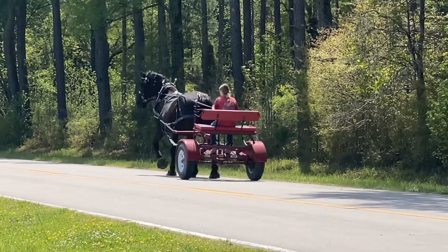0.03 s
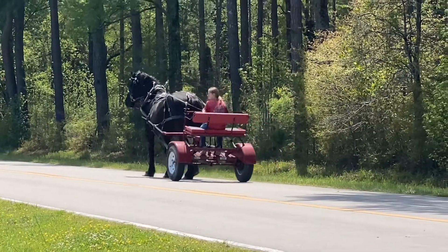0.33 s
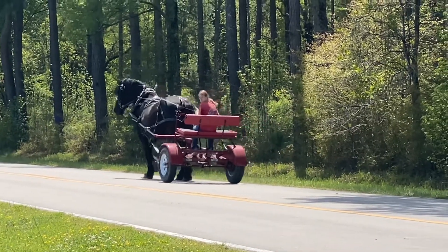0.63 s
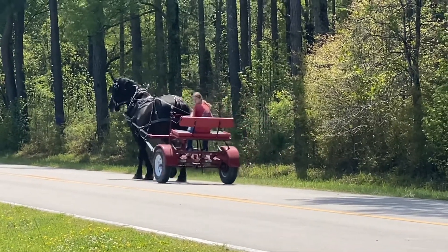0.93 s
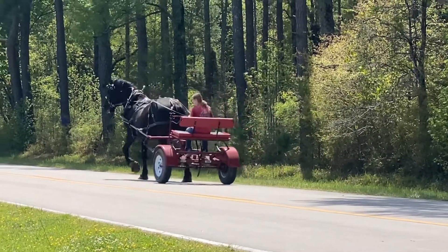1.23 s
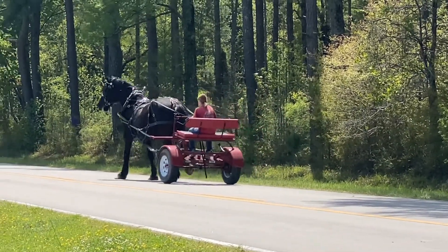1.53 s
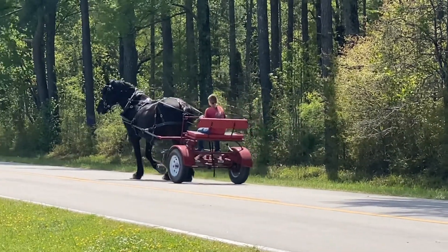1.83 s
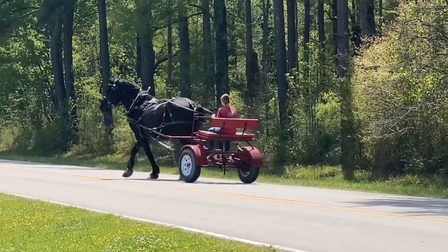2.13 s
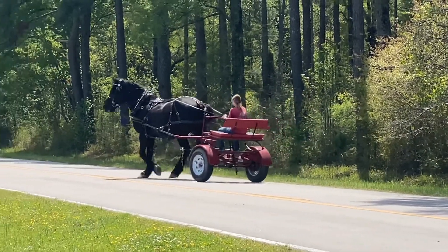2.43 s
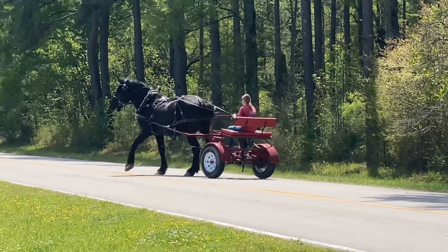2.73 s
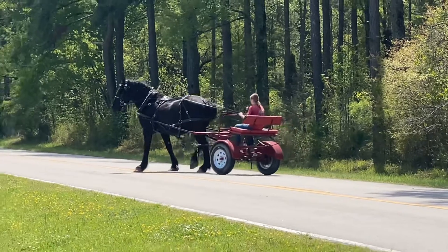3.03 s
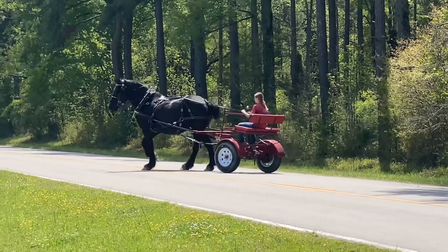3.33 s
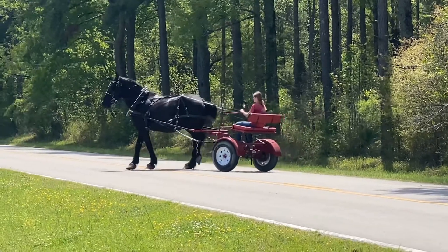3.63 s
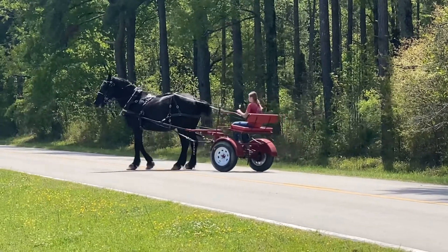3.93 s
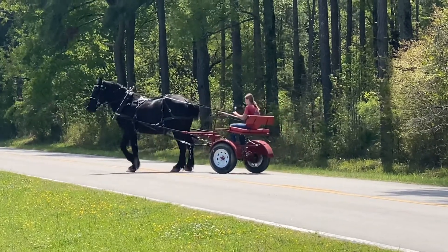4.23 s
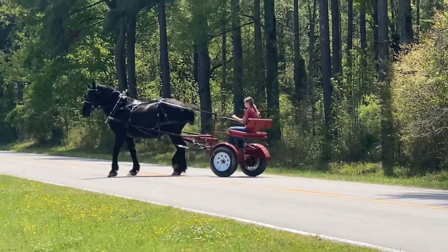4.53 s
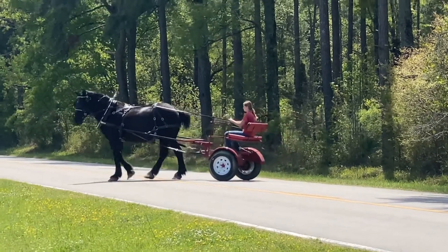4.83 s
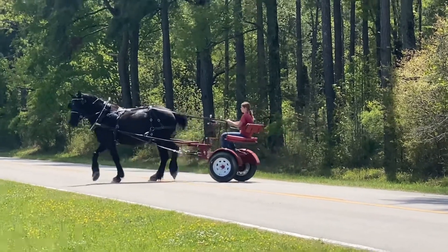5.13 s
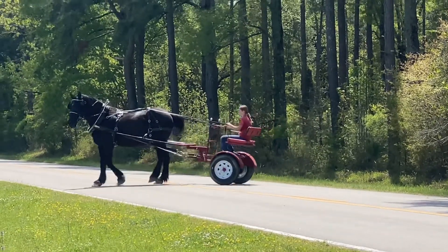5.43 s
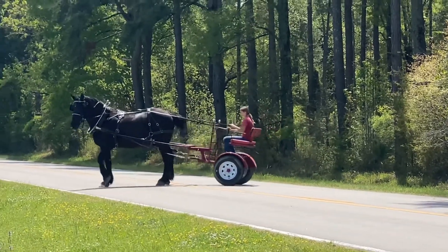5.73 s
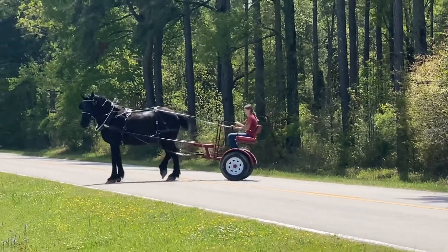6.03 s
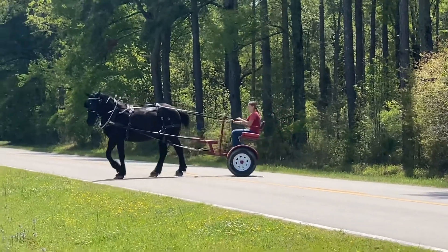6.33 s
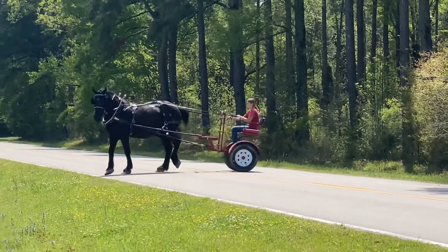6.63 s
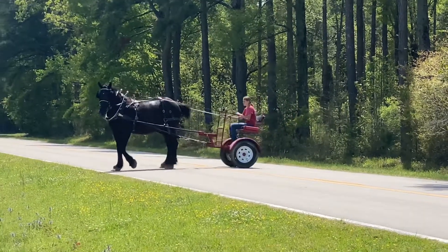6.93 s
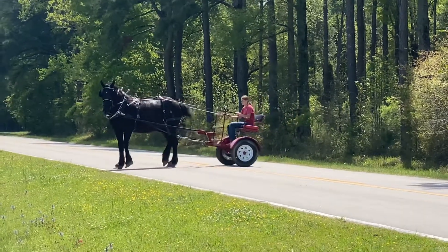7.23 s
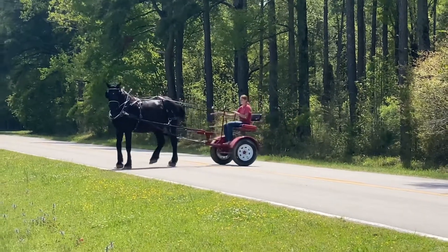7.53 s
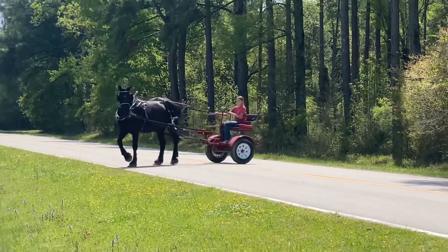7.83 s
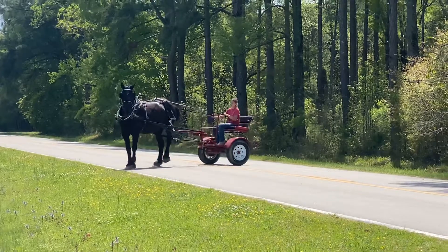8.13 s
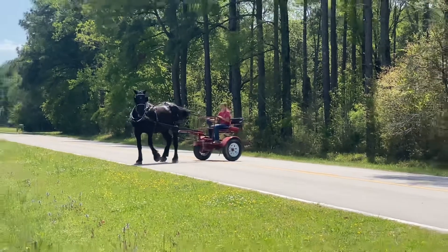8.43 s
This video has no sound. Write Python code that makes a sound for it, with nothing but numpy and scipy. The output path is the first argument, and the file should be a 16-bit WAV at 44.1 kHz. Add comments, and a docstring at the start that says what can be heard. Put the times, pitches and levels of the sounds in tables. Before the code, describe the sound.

Outdoors beside a wood, sparse hollow hoof clops mix with light clanks from a cart and the ticking and jingling of a harness. Birds chirp and warble with a slight echo above softly rustling trees. One short metallic squeak comes before the middle. Wind, at first only a few low puffs, then thumps and rumbles against the microphone in stronger gusts as the hooves and buckles carry on.

```python
"""A hoof clops and a hitch clanks in a puff of wind: a draught horse pulls a two-wheeled cart past a
pine wood. Each hoof rings like a hollow cup on the paved road while its shoe crushes grit. Loose steel
rattles, a dry joint squeaks once, and harness straps rub and shake their rings and buckles.
Birds sing among the echoing trunks, over a soft wash of trees and tyres.
Gusts buffet the microphone, mostly from the middle on."""
import sys
import numpy as np
from scipy import signal
from scipy.fft import rfft, irfft, next_fast_len
from scipy.io import wavfile

SR = 44100
rng = np.random.default_rng(int(sys.argv[2]) if len(sys.argv) > 2 else 0)


def master_out(mix):
    """Clip the mix to full scale and print it as 16-bit PCM to the path in sys.argv[1]."""
    frames = np.transpose(np.atleast_2d(mix))
    ceiling = np.clip(frames, -1, 1)
    pcm = np.round(ceiling * 32767).astype(np.int16)
    wavfile.write(sys.argv[1], SR, pcm)


N = 377937
TIME = np.arange(N) / SR  # seconds since the scene began
AGE = np.arange(SR // 2) / SR  # seconds since one short event began

# Levels are relative. A fade time (t60) is how long a sound takes to drop by 60 dB.
# Rustling trees and rolling tyres: (time [s], body level [dB], hiss level [dB])
WASH_LEVELS = [(0.0, -66.5, -67.5), (0.6, -70.5, -75), (1.0, -70.5, -76.5), (1.15, -69.5, -74.5),
               (2.34, -67.5, -73), (2.46, -66, -69), (2.76, -67.5, -74), (3.95, -65, -68.5),
               (4.3, -65, -74.5), (5.6, -64.5, -75), (6.2, -61, -72.5), (6.9, -63, -72), (7.7, -64, -70.5),
               (8.56, -63.5, -73)]
# Tone colour of their low body and their hiss: (frequency [Hz], level [dB])
BODY_SPECTRUM = [(20, -1), (60, 21), (300, 15), (500, 14.5), (800, 9), (1200, 2.5), (2100, 2.5),
                 (3000, -14.5), (5000, -70.5)]
HISS_SPECTRUM = [(1200, -4), (2500, 14.5), (3500, 11.5), (5200, 8), (6500, 2), (7800, -1.5), (9500, -6),
                 (11000, -11), (12000, -17.5), (15000, -29)]
# How alike the left and right noise are: (frequency [Hz], likeness [1 = the same])
STEREO_LIKENESS = [(30, 0.89), (300, 0.89), (600, 0.57), (1000, 0.31), (2000, 0.64), (4000, 1), (6500, 1),
                   (8000, 0.041), (11000, .2)]
# Echo among the trunks: (frequency [Hz], fade time [s])
TRUNK_ECHO = [(200, 0.24), (1000, 0.23), (2500, 0.29), (5000, 0.036), (11000, 0.19)]

# Gusts at the microphone: (start [s], length [s], rumble level [dB], flutter level [dB])
GUSTS = [(-.03, 0.23, -42, -59), (0.472, 0.31, -48, -62.5), (1.42, 4.4, -55.5, -64.5),
         (3.475, 0.32, -41.5, -69), (3.874, 0.34, -36.5, -65), (4.257, 0.81, -40.5, -53),
         (5.664, 0.58, -38.5, -52.5), (6.52, 0.65, -41, -56), (6.95, 0.51, -33.5, -48.5),
         (7.508, 0.16, -29, -42), (7.83, 0.47, -42, -60), (8.466, 0.093, -32, -39)]
# Tone colour of the wind's deep rumble and higher flutter: (frequency [Hz], level [dB])
RUMBLE_SPECTRUM = [(12, -54), (25, -33.5), (45, -5.5), (62, -2), (110, -7.5), (180, -17), (350, -33.5),
                   (800, -81)]
FLUTTER_SPECTRUM = [(40, -6), (110, 0.5), (200, -2.5), (350, -3), (550, -20), (850, -35), (1500, -53.5),
                    (4000, -86)]
# The largest swirls of air: (time [s], level [dB], starting frequency [Hz], length [s])
EDDIES = [(0.53, -36, 63, 0.012), (2.455, -39, 76, 0.016), (3.53, -24, 72.7, 0.016),
          (3.595, -30, 149.4, 0.014), (3.663, -27, 93.2, 0.01), (3.905, -32, 119.7, 0.021),
          (3.961, -19.5, 77.3, 0.015), (4.005, -30.5, 71, 0.049), (4.17, -37.5, 168, 0.034),
          (4.215, -30.5, 163.2, 0.016), (4.385, -34, 201.3, .012), (4.65, -34.5, 230.3, 0.031),
          (4.727, -29.5, 138.3, .012), (4.747, -30, 227.3, 0.018), (4.902, -26, 170, 0.0086),
          (4.921, -30, 208.5, 0.017), (5.034, -30, 159.7, 0.0092), (5.488, -32.5, 81, 0.0072),
          (5.827, -23, 300.5, 0.0054), (5.879, -24.5, 280.3, 0.021), (5.962, -30.5, 178, 0.011),
          (6.001, -25, 211.5, 0.017), (6.143, -36, 249.4, 0.011), (6.213, -28, 180.5, .024),
          (6.523, -24, 86.6, 0.0071), (6.54, -28.5, 229.5, 0.004), (6.692, -28, 84, 0.017),
          (7.022, -30.5, 281.5, 0.023), (7.044, -23.5, 400, 0.019), (7.153, -26, 440.2, 0.02),
          (7.369, -21.5, 189.4, 0.013), (7.423, -29, 88.5, 0.028), (7.519, -26, 335, 0.011),
          (7.544, -20.5, 340.2, 0.012), (7.577, -20, 115, 0.033), (7.643, -26.5, 227.6, .01),
          (7.666, -28.5, 249, 0.026), (8.024, -35, 207, 0.028), (8.225, -35, 70.2, 0.012),
          (8.53, -15.5, 199.5, 0.0087)]

# Bird notes by name: (length [s], first pitch [Hz], last pitch [Hz], bend [over 1 glides late],
# trill [share of the pitch], swell [over 1 peaks late])
NOTE_SHAPES = { "fall": (.095, 4700, 3300, 1.3, .045, 1.3), "climb": (.085, 2450, 3300, 1.3, .04, 2.2),
               "chip": (.032, 3120, 3750, 2.2, .006, 1), "seet": (.045, 5750, 5250, 1, .006, 1),
               "zip": (.035, 6500, 7550, .7, .02, 1), "whistle": (.14, 4760, 4880, 1.3, .006, 2.8),
               "pip": (.095, 4880, 4950, 1, .006, 2.5), "swoop": (.085, 2900, 4400, .42, .004, .7),
               "high": (.07, 7100, 8250, .5, .002, 1), "slide": (.12, 6900, 7700, .5, .002, .6)}
# When the warbler sings: (start [s], end [s], level [dB])
WARBLES = [(1.279, 3.0, -65), (7.117, 8.55, -65)]
# The warbler's phrase and a second bird's call: (delay [s], level [dB], note name)
WARBLE_PHRASE = [(0.0, 1.5, "climb"), (.116, 1, "fall")]
CHIP_CALL = [(0.0, 0, "chip"), (0.118, -7, "chip")]
# Thin notes from other birds: (time [s], level [dB], note name)
SINGLE_NOTES = [(0.187, -57.5, "zip"), (5.452, -52, "whistle"), (5.568, -61.5, "swoop"),
                (5.606, -59, "pip"), (5.68, -63.5, "high"), (5.75, -67, "slide"), (7.585, -63, "seet")]

# Straps sliding over the horse: (start [s], length [s], rubbing level [dB], jingling level [dB])
STRAP_SLIDES = [(0.12, 0.46, -75, -84), (0.56, 0.26, -74, -69.5), (1.044, 0.46, -73, -73.5),
                (3.47, 0.18, -75, -72), (5.242, 0.33, -75, -86), (6.484, 0.37, -76, -72.5),
                (7.144, 0.93, -77, -89)]
# The tones of a buckle: (pitch [Hz], level [dB], fade time [s])
BUCKLE_TONES = [(5500, 2, 0.042), (5840, 0, 0.044), (10300, -12, 0.044)]
# Buckles and chain links ticking: (time [s], level [dB])
LINK_TICKS = [(0.407, -47), (0.575, -45.5), (0.694, -43.5), (1.291, -49), (1.546, -44), (2.335, -50.5),
              (3.198, -34), (3.362, -43.5), (3.389, -45), (3.533, -54), (3.797, -58), (3.939, -52),
              (3.96, -54), (4.22, -47), (5.168, -44), (5.214, -46), (5.985, -49.5), (6.525, -50),
              (6.544, -38), (6.566, -42), (6.611, -43), (6.677, -46.5), (6.942, -41), (7.179, -40),
              (7.21, -46), (7.332, -54), (7.443, -39.5), (7.77, -50), (7.817, -38), (8.401, -44)]
# Steel fittings ringing on: (time [s], level [dB], pitch [Hz], fade time [s])
FITTING_RINGS = [(.07, -58.5, 2046, 1.4), (3.2, -57, 10080, 0.24), (3.199, -63, 10740, 0.28),
                 (3.386, -55.5, 1975, 1.4), (3.385, -52, 1900, 0.55), (3.386, -69, 3950, .8)]
# A small harness ring jingling: (time [s], level [dB], fade time [s])
JINGLES = [(0.447, -63, 0.15), (.752, -67, 0.37), (1.48, -66, 0.44), (1.676, -64, 0.14), (6.548, -63, .3),
           (6.6, -63, 0.17)]
# The tones of that ring: (pitch [Hz], level [dB])
JINGLE_TONES = [(5280, 0.5), (5440, 3), (10800, -4.5), (14200, -10)]

# The course of the dry joint's squeak: (time [s], level [dB], pitch [Hz])
SQUEAK_CURVE = [(3.376, -42, 1880), (3.381, -52, 1900), (3.389, -40.5, 1999), (3.403, -53, 1932),
                (3.44, -52, 1910), (3.48, -64, 1960)]
# The tones in the squeak: (multiple of the pitch, level [dB])
SQUEAK_TONES = [(1, -1.5), (2, -7), (3, -8)]
# The loose hitch and shafts knocking:
# (time [s], level [dB], centre frequency [Hz], fade time [s], frame ringing [dB])
CLANKS = [(0.063, -53, 5500, 0.19, -32), (0.082, -47, 4000, 0.04, -40), (1.1, -53.5, 4300, 0.3, -13),
          (1.121, -44.5, 5450, 0.038, -22), (2.397, -43, 3560, 0.11, -18.5), (2.418, -59, 2200, 0.1, 2.5),
          (2.5349, -46, 3800, 0.16, -14), (2.586, -52.5, 2960, 0.39, -14), (3.835, -40.5, 3050, 0.057, -31),
          (3.988, -43, 3660, 0.09, -21), (7.276, -46.5, 4080, 0.037, -25)]
# The tones of the cart's frame: (pitch [Hz], level [dB], fade time [s])
FRAME_TONES = [(1192, -0.5, 0.28), (1796, 0.5, 0.18), (3090, 1, 0.05), (5600, -3, 0.093)]

# Shoes dragging on the road: (time [s], length [s], level [dB], centre frequency [Hz])
SHOE_SCRAPES = [(.336, 0.015, -78, 1680), (0.723, 0.011, -69.5, 676), (2.27, 0.021, -76.5, 1600),
                (2.962, 0.039, -77, 890), (3.671, 0.035, -72, 1200), (4.093, 0.025, -70.5, 1390),
                (5.603, 0.02, -72, 1400), (6.99, 0.013, -67.5, 1690), (8.09, 0.013, -72.5, 1490)]
# Hooves landing: (time [s], level [dB], pitch [Hz], grit level [dB], fade time [s])
HOOF_STEPS = [(0.062, -29, 1320, -73, 0.0052), (0.598, -45, 726, -79, 0.029), (.604, -39, 363, -84, 0.01),
              (1.983, -46, 406, -71, 0.027), (2.265, -48, 694, -83, 0.02), (2.566, -46.5, 765, -65, 0.04),
              (2.997, -48, 420, -78, 0.036), (3.218, -42.5, 432, -70, 0.021),
              (4.021, -46, 732, -67.5, 0.049), (5.583, -43, 850, -80, 0.008),
              (5.612, -44.5, 610, -69.5, 0.029), (6.992, -37, 1120, -63, 0.0044),
              (7.919, -45.5, 510, -85, 0.03), (8.311, -44, 563, -65.5, 0.038),
              (8.433, -49, 654, -82, 0.029)]


def amp(db):
    """Turns decibels into a number to multiply a sound by."""
    return 10 ** (np.asarray(db) / 20)


def unit(x):
    """Scales a signal to an average strength (rms) of 1."""
    return x / np.sqrt(np.mean(x ** 2) + 1e-30)


def read(points, hz):
    """Looks up a table's value at hz, on a scale where all octaves are equally wide."""
    f, value = np.transpose(points)
    return np.interp(np.log(hz + 1), np.log(f), value)


def follow(rows, t=TIME):
    """Looks up each column of a table at the times t."""
    times, *columns = np.transpose(rows)
    return [np.interp(t, times, column) for column in columns]


def add(mix, s, sound):
    """Mixes a sound in at s seconds."""
    part = mix[max(round(s * SR), 0):][:len(sound)]
    part += sound[:len(part)]


def rise(seconds):
    """A soft start."""
    return 1 - np.exp(-AGE / seconds)


def fade(t60, t=AGE):
    """Dies away by 60 dB every t60 seconds."""
    return np.exp(-np.log(1000) * t / t60)


def tone(hz):
    """A pure tone that starts at a random point in its wave."""
    return np.sin(2 * np.pi * (hz * AGE + rng.random()))


def band(hz, octaves, size=len(AGE)):
    """Noise that is strongest at hz and weaker to either side."""
    f = np.fft.rfftfreq(size, 1 / SR) + 1
    bell = np.exp(-.5 * (np.log2(f / hz) / octaves) ** 2)
    return unit(irfft(rfft(rng.standard_normal(size)) * bell, size))


def wander(rate, size=len(AGE)):
    """A smooth random wobble, up to about rate times a second."""
    f = np.fft.rfftfreq(size, 1 / SR)
    return unit(irfft(rfft(rng.standard_normal(size)) * np.exp(-(f / rate) ** 2), size))


def stereo_noise(spectrum, low_hz, high_hz):
    """Left and right noise; the part they share has strength 1 between low_hz and high_hz."""
    f = np.fft.rfftfreq(N, 1 / SR)
    mid, side = rfft(rng.standard_normal((2, N))) * amp(read(spectrum, f))
    alike = read(STEREO_LIKENESS, f)
    side = side * np.sqrt((1 - alike) / (1 + alike))
    strength = irfft(mid * (f > low_hz) * (f < high_hz), N).std()
    return irfft(np.array([mid + side, mid - side]), N) / strength


def woods(x, echo_db, width=0.32, echoes_per_s=2000):
    """The direct sound plus stereo echoes scattered by the trunks."""
    bounces = rng.standard_normal((2, SR)) * (rng.random((2, SR)) < echoes_per_s / SR)
    hz, t, spectra = signal.stft(bounces, SR, nperseg=256)
    spectra = spectra * fade(read(TRUNK_ECHO, hz)[:, None], t) * np.minimum(t / 0.0011, 1)
    tail = signal.istft(spectra, SR, nperseg=256)[1]
    mid, side = signal.fftconvolve(x[None], tail / np.linalg.norm(tail[0]), axes=1)[:, :N]
    return x + amp(echo_db) * np.array([mid + width * side, mid - width * side])


def far_echo(x, echo_db, t60, echoes_per_s=2000):
    """The direct sound plus a long, soft echo from deep in the wood."""
    t = np.arange(SR) / SR
    bounces = rng.standard_normal(SR) * (rng.random(SR) < echoes_per_s / SR)
    tail = bounces * fade(t60, t) * np.minimum(t / 0.0064, 1)
    return x + amp(echo_db) * signal.fftconvolve(x, tail / np.linalg.norm(tail))[:N]


def trees_and_tyres(body_db=-0.96, hiss_db=-1):
    """Rustling trees and rolling tyres blend into a steady wash with a slightly restless hiss."""
    body_level, hiss_level = follow(WASH_LEVELS)
    body = stereo_noise(BODY_SPECTRUM, 1000, 2500) * amp(body_level + body_db)
    hiss = stereo_noise(HISS_SPECTRUM, 3500, 8000) * amp(hiss_level + hiss_db + .5 * wander(22, N))
    return body + hiss


def wind(attack_s=0.0083, t60=0.37, wake_s=0.021, quick_hz=190, lump_db=4.5):
    """Air churns at the microphone: each gust swells, holds and dies away, rumbling and fluttering."""
    rumble_gain, flutter_gain = amp(-60), amp(-64)  # the calm between gusts
    for s, length, rumble_db, flutter_db in GUSTS:
        swell = np.clip((TIME - s) / attack_s, 0, 1) * fade(t60, np.maximum(TIME - s - length, 0))
        rumble_gain = np.maximum(rumble_gain, amp(rumble_db) * swell)
        flutter_gain = np.maximum(flutter_gain, amp(flutter_db) * swell)
    for s, db, hz, _ in EDDIES:  # slow swirls stir up the rumble, quick ones the flutter
        wake = amp(db) * np.exp(-np.minimum(((TIME - s) / wake_s) ** 2, 20))
        quick = hz ** 3 / (hz ** 3 + quick_hz ** 3)
        rumble_gain = np.maximum(rumble_gain, amp(-12) * wake * (1 - quick))
        flutter_gain = np.maximum(flutter_gain, amp(-13) * wake * quick)
    lumps = lump_db * wander(30, N)
    rumble = stereo_noise(RUMBLE_SPECTRUM, 25, 150) * rumble_gain * amp(0.65 * lumps - 1)
    flutter = stereo_noise(FLUTTER_SPECTRUM, 200, 600) * flutter_gain * amp(lumps - 1)
    return rumble + flutter


def buffets(rise_cycles=0.31, rest_hz=66, slowing=0.535, unsteady=0.22, lead_s=.05):
    """A swirl of air hits the microphone: the pressure swings, then settles unevenly to a low wobble."""
    out = np.zeros((2, N))
    t = AGE - lead_s  # zero at the peak of the hit
    for s, db, hz, length in EDDIES:
        from_peak = np.where(t < 0, t * hz / rise_cycles, np.pi / 2 * t / length)
        swell = amp(db) / np.cosh(np.clip(from_peak, -20, 20))
        pitch = rest_hz + (hz - rest_hz) * np.exp(-np.maximum(t, 0) / (slowing * length))
        cycles = np.cumsum(pitch * np.exp(unsteady * wander(250))) / SR + rng.random()
        lean = .1 * rng.standard_normal()  # a little to the left or right
        for channel, tilt in zip(out, (lean, -lean)):
            add(channel, s - lead_s, (1 + tilt) * swell * np.sin(2 * np.pi * cycles + tilt))
    return out


def bird_note(length, first_hz, last_hz, bend, trill, swell=1, octave_db=-60):
    """One gliding whistle that swells and fades, with a weak overtone an octave up."""
    progress = np.minimum(AGE / length, 1)
    hz = (first_hz + (last_hz - first_hz) * progress ** bend) * (1 + trill * wander(350))
    phase = 2 * np.pi * np.cumsum(hz) / SR
    loudness = np.sqrt(abs(np.sin(np.pi * progress ** swell)))
    return loudness * (np.sin(phase) + amp(octave_db) * np.sin(2 * phase))


def far_birds(level_db=-76, spread_db=5.5, low_hz=2100, high_hz=4200, count=260):
    """Far birds twitter at random deep in the wood."""
    out = np.zeros(N)
    for when, pitch, glide, length in rng.random((count, 4)):
        hz = low_hz * (high_hz / low_hz) ** pitch
        note = bird_note(0.014 + 0.025 * length, hz, hz * (1 + .22 * (glide - .5)), bend=1, trill=0.013)
        add(out, when * N / SR, amp(level_db + spread_db * rng.standard_normal()) * note)
    return far_echo(out, echo_db=-6.5, t60=.6)


def warbler(period_s=.2515, vary_octaves=0.043, ragged_db=3.5, level_db=-3):
    """A warbler see-saws up and down, its ragged notes never quite alike and half lost in their echo."""
    out = np.zeros(N)
    notes = [(s + delay, db + level, name)
             for start, end, db in WARBLES
             for s in np.arange(start, end, period_s)
             for delay, level, name in WARBLE_PHRASE]
    for (s, db, name), drift in zip(notes, rng.standard_normal((len(notes), 2))):
        length, first_hz, last_hz, *shape = NOTE_SHAPES[name]
        pitches = np.array([first_hz, last_hz]) * 2 ** (vary_octaves * drift)
        add(out, s, amp(db + ragged_db * wander(83)) * bird_note(length, *pitches, *shape))
    return amp(level_db) * far_echo(out, echo_db=-2, t60=.64)


def near_birds(call_start_s=3.56, call_end_s=4.8, period_s=.286, call_db=-56.5):
    """One nearer bird repeats an even two-note call; others whistle thin single notes."""
    out = np.zeros(N)
    for s in np.arange(call_start_s, call_end_s, period_s):
        for delay, level, name in CHIP_CALL:
            add(out, s + delay, amp(call_db + level) * bird_note(*NOTE_SHAPES[name]))
    for s, db, name in SINGLE_NOTES:
        octave_db = -12 if name in ("whistle", "pip") else -np.inf  # only steady notes get an overtone
        add(out, s, amp(db) * bird_note(*NOTE_SHAPES[name], octave_db=octave_db))
    return far_echo(out, echo_db=-8, t60=0.79)


def straps(rub_hz=6500, grain_db=3, shakes_per_s=150):
    """Straps slide in soft, grainy swells while small knocks keep their buckles ringing."""
    rub = band(rub_hz, octaves=0.32, size=N) * amp(grain_db * wander(150, N))
    knocks = (rng.random(N) < shakes_per_s / SR) * rng.standard_normal((len(BUCKLE_TONES), N))
    tones = [amp(db) * tone(hz) * fade(t60) * rise(0.0007) for hz, db, t60 in BUCKLE_TONES]
    jingle = unit(sum(signal.oaconvolve(hits, ring)[:N] for hits, ring in zip(knocks, tones)))
    out = np.zeros(N)
    for s, length, rub_db, jingle_db in STRAP_SLIDES:
        swell = np.sin(np.pi * np.clip((TIME - s) / length, 0, 1))
        out += swell * (amp(rub_db) * rub + amp(jingle_db) * jingle)
    return out


def small_links(level_db=5, range_db=9, low_hz=4800, high_hz=8000, t60=0.019, count=110):
    """Small links tick at random, more strongly when the trees and tyres hiss louder."""
    out = np.zeros(N)
    for when, softness, *pitches in rng.random((count, 7)):
        s = when * N / SR
        _, hiss_db = follow(WASH_LEVELS, s)
        link = sum(tone(low_hz * (high_hz / low_hz) ** pitch ** 2) for pitch in pitches)
        add(out, s, amp(hiss_db + level_db - range_db * softness) * link * fade(t60))
    return out


def link_ticks(tick_hz=6100, link_db=-13, link_t60=0.022, cutoff_hz=11000):
    """Buckles and chain links tick and settle, each with four short tones of its own."""
    out = np.zeros(N)
    shape = amp(-3) * fade(0.012) + amp(-24) * fade(0.25)  # a sharp tick, then quiet settling
    for s, db in LINK_TICKS:
        pitches = tick_hz * 2 ** rng.uniform(-0.241, 1.0, size=4)
        link = sum(tone(hz) for hz in pitches) * fade(link_t60)
        tick = band(tick_hz, octaves=0.58) * shape * amp(2.8 * wander(300))
        add(out, s, amp(db) * (tick + amp(link_db) * link) * rise(0.002))
    return signal.sosfilt(signal.butter(6, cutoff_hz, fs=SR, output="sos"), out)


def fittings(level_db=-1, waver_db=4.1):
    """Steel fittings ring on in pure tones that waver in loudness."""
    out = np.zeros(N)
    for s, db, hz, t60 in FITTING_RINGS:
        ring = tone(hz) * amp(waver_db * wander(70))
        add(out, s, amp(db + level_db) * ring * fade(t60) * rise(0.0022))
    return out


def harness_ring(level_db=-1, flutter_db=5.0, detune=0.009):
    """A small ring rattles as it chimes, so each of its tones flutters on its own."""
    out = np.zeros(N)
    for s, db, t60 in JINGLES:
        chime = sum(tone(hz * (1 + detune * rng.standard_normal()))
                    * amp(level + flutter_db * wander(200)) for hz, level in JINGLE_TONES)
        add(out, s, amp(db + level_db) * chime * fade(t60) * rise(0.00092))
    return out


def squeak(roughness=0.022, dulling_db_per_s=60):
    """A dry joint sticks and slips; its overtones fade as the pressure eases."""
    t = np.arange(SQUEAK_CURVE[0][0], SQUEAK_CURVE[-1][0], 1 / SR)
    db, hz = follow(SQUEAK_CURVE, t)
    cycles = np.cumsum(hz * (1 + roughness * wander(290, len(t)))) / SR
    dulling_db = dulling_db_per_s * (t - t[0])
    slips = sum(amp(level - (multiple > 1) * dulling_db) * np.sin(2 * np.pi * multiple * cycles)
                for multiple, level in SQUEAK_TONES)
    out = np.zeros(N)
    add(out, t[0], amp(db) * slips * rise(0.0019)[:len(t)])
    return out


def hitch(crash_db=-7, chatter_db=3, jostle=0.027):
    """Loose steel chatters and sets the cart's frame ringing."""
    out = np.zeros(N)
    for s, db, hz, t60, ring_db in CLANKS:
        crash = band(hz, octaves=0.6) * fade(t60) * amp(chatter_db * wander(77))
        ring = np.zeros(len(AGE))
        for frame_hz, level, frame_t60 in FRAME_TONES:
            pitch = frame_hz * (1 + jostle * wander(200))  # the loose contact jostles each tone
            ring += amp(level) * np.sin(2 * np.pi * np.cumsum(pitch) / SR) * fade(frame_t60)
        add(out, s, amp(db) * (amp(crash_db) * crash + amp(ring_db) * ring) * rise(0.00096))
    return out


def shoe_scrapes(grain_db=4):
    """A horseshoe slides a little and crushes grit in one short, grainy swell."""
    out = np.zeros(N)
    for s, length, db, hz in SHOE_SCRAPES:
        swell = np.sin(np.pi * np.minimum(AGE / length, 1))
        add(out, s, amp(db + grain_db * wander(400)) * swell * band(hz, octaves=0.72))
    return out


def hooves(overtone_ratio=1.843, rise_cycles=0.42, grain_db=4, toe_delay_s=.0028, cutoff_hz=2000):
    """Each hoof rings like a hollow cup over a thud and a scuff; its shoe cracks down and crushes grit."""
    knocks, crunch = np.zeros((2, N))
    for s, db, hz, grit_db, t60 in HOOF_STEPS:
        cup = (tone(hz) + amp(-11) * tone(hz * overtone_ratio)) * fade(t60)
        thud = amp(-10) * tone(hz / 2) * fade(t60)
        scuff = amp(-9) * band(hz, octaves=0.45) * fade(2 * t60)
        add(knocks, s, amp(db) * (cup + thud + scuff) * rise(rise_cycles / hz))
        grit = amp(grit_db - 6 + grain_db * wander(660)) * band(3250, octaves=0.55) * fade(0.13)
        add(crunch, s, grit)
        toe_crack = amp(grit_db + 10) * band(2300, octaves=0.64) * fade(0.013)
        add(crunch, s + toe_delay_s, toe_crack)
    muffle = signal.butter(5, cutoff_hz, fs=SR, output="sos")  # a hoof is too soft to ring high
    return signal.sosfilt(muffle, knocks) + crunch


def scene():
    """Horse and cart on the road, birds in the wood, wind at the microphone."""
    horse = amp(9.5) * woods(hooves(), echo_db=-14.5) + amp(16) * woods(shoe_scrapes(), echo_db=-1.5)
    cart = amp(3) * woods(hitch(), echo_db=-3.5)
    harness = link_ticks() + fittings() + harness_ring() + small_links() + straps()
    cart += woods(harness, echo_db=-16) + woods(squeak(), echo_db=-1.5)
    birds = amp(-5) * woods(near_birds(), echo_db=-1.5)
    birds += woods(warbler(), echo_db=-14) + woods(far_birds(), echo_db=-12)
    return horse + cart + birds + trees_and_tyres() + wind() + amp(2.5) * buffets()


def record(dry, notch_hz=8480, notch_width_hz=280, notch_db=-22, muffle_hz=11350, cutoff_hz=15200):
    """The microphone's openings cut a narrow notch in the treble; the very top is muffled, then cut."""
    size = next_fast_len(N + SR, True)
    f = np.fft.rfftfreq(size, 1 / SR)
    notch = amp(notch_db * np.exp(-((f - notch_hz) / notch_width_hz) ** 2))
    muffle = amp(-9 - 6 * np.tanh((f - muffle_hz) / 200))  # -3 dB below muffle_hz, -15 dB above
    # across the notch, the left and right waves slip one full cycle apart
    slip = np.pi / 2 * (1 + np.tanh((f - notch_hz) / 900)) * np.array([[-1], [1]])
    heard = irfft(rfft(dry, size) * notch * muffle * np.exp(1j * slip), size)[:, :N]
    top_cut = signal.firwin(255, cutoff_hz, window=("kaiser", 7), fs=SR)
    return signal.oaconvolve(heard, top_cut[None], "same")


dry = scene()
out = record(dry)
master_out(out)
```